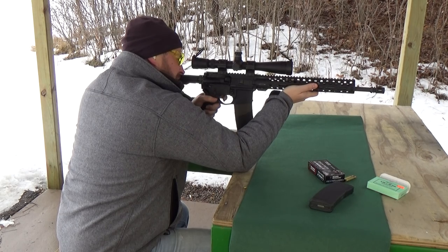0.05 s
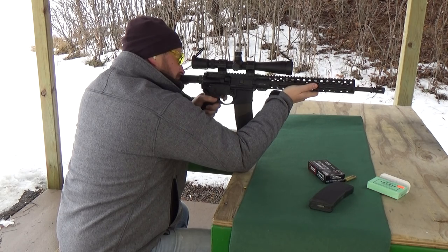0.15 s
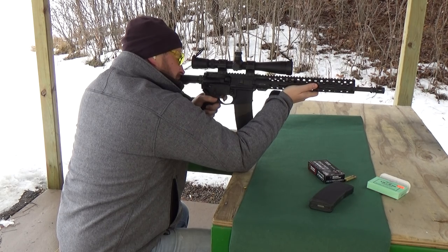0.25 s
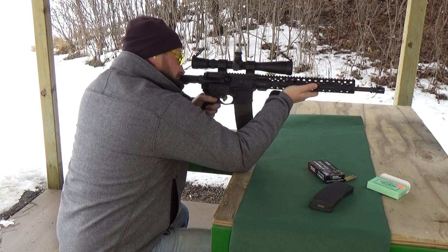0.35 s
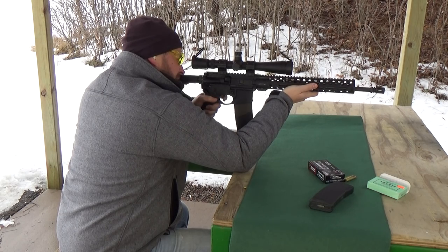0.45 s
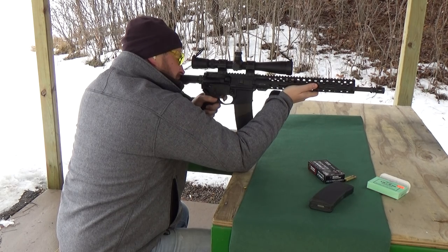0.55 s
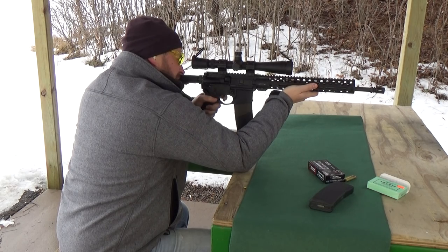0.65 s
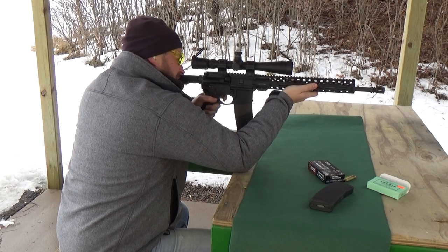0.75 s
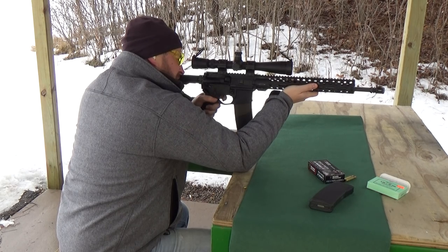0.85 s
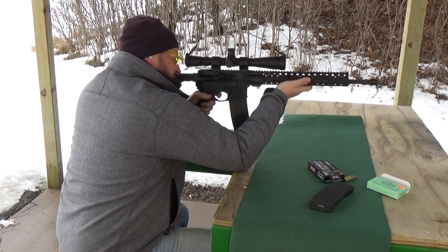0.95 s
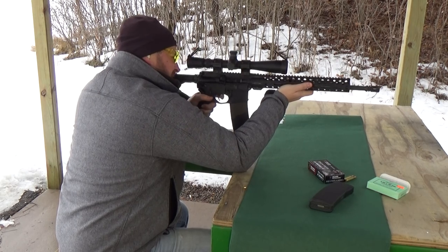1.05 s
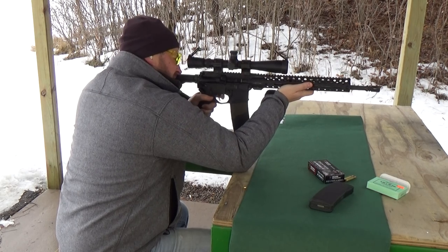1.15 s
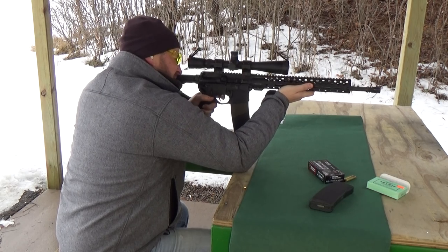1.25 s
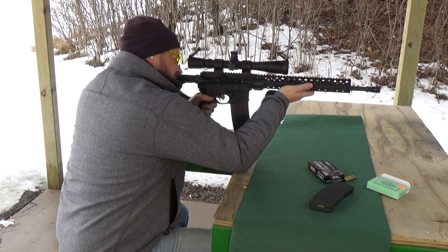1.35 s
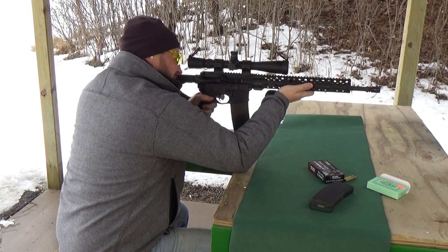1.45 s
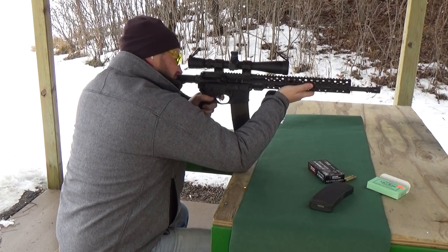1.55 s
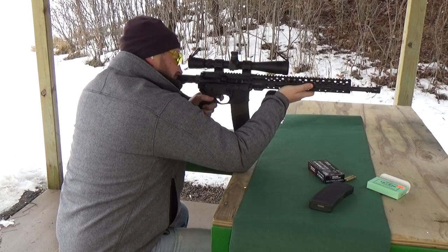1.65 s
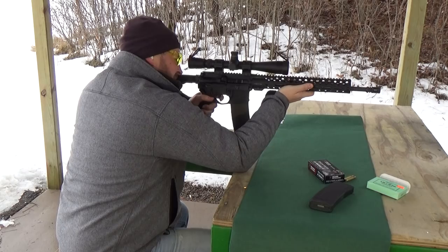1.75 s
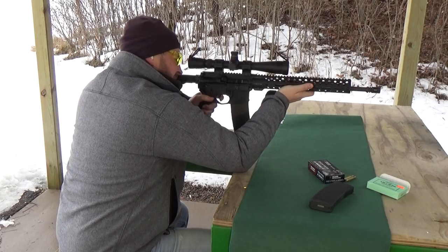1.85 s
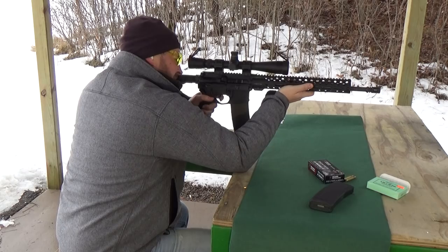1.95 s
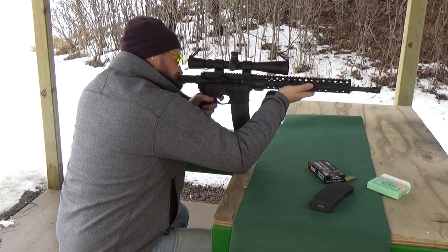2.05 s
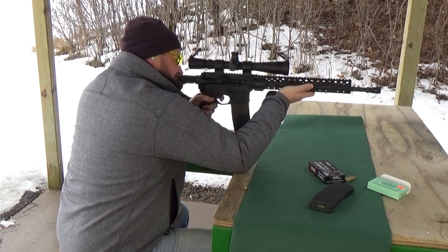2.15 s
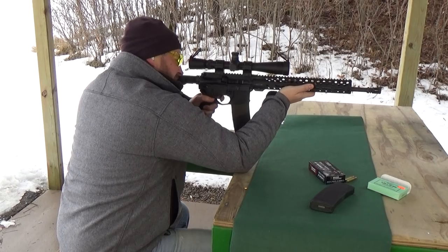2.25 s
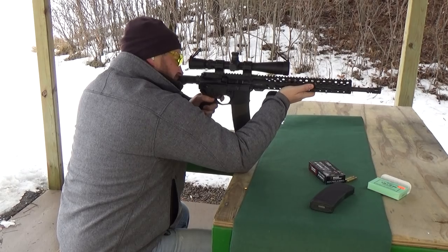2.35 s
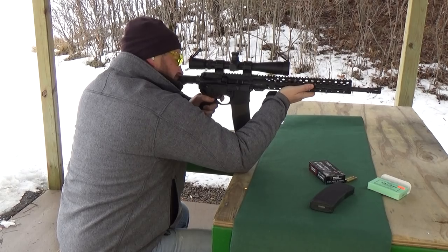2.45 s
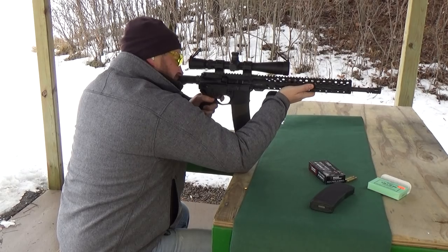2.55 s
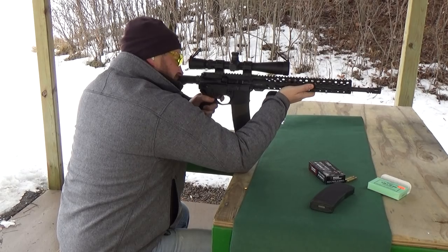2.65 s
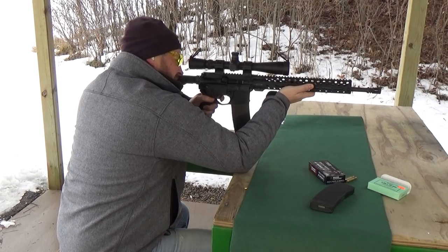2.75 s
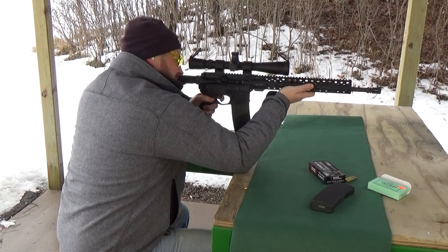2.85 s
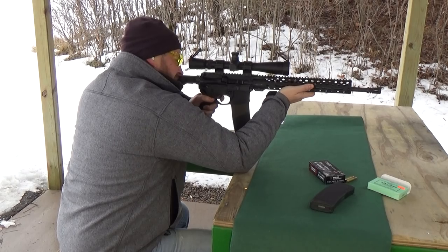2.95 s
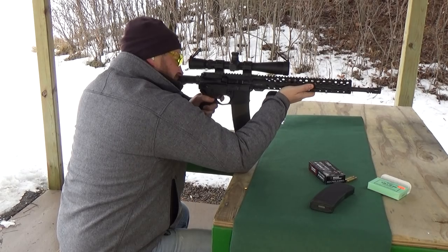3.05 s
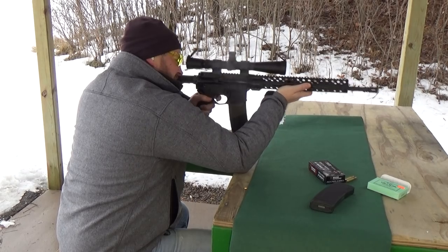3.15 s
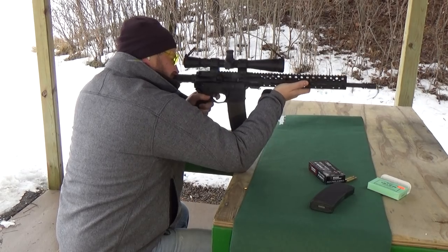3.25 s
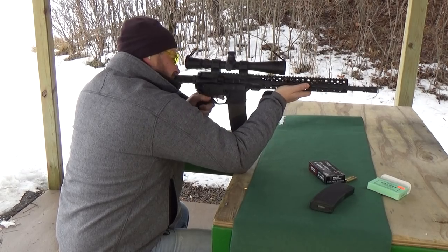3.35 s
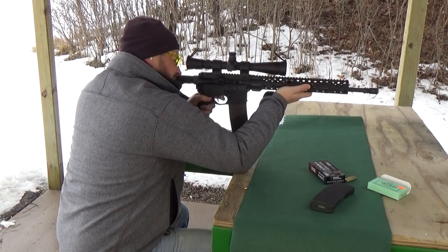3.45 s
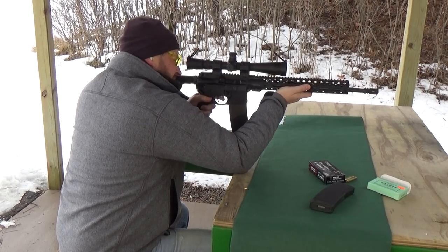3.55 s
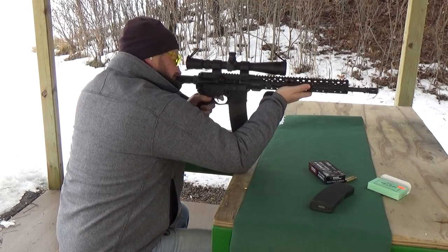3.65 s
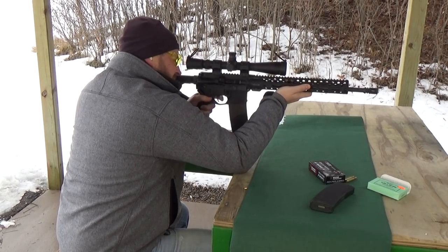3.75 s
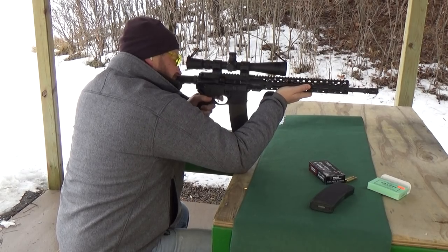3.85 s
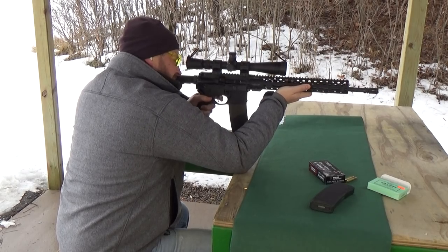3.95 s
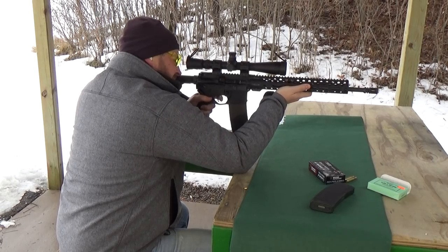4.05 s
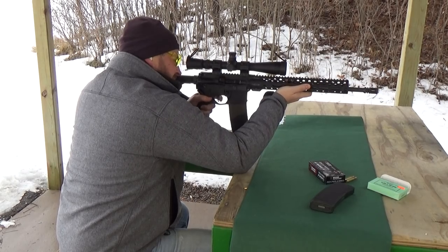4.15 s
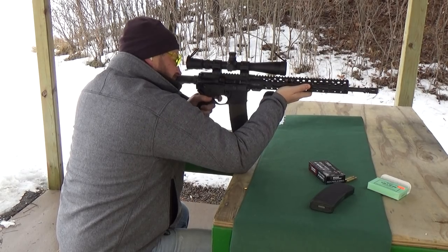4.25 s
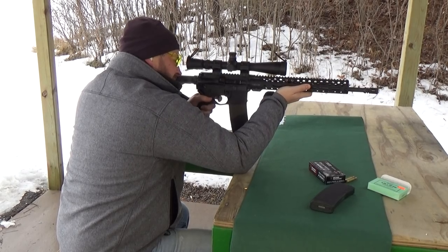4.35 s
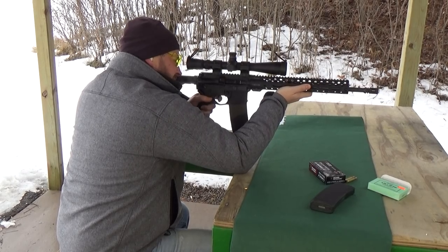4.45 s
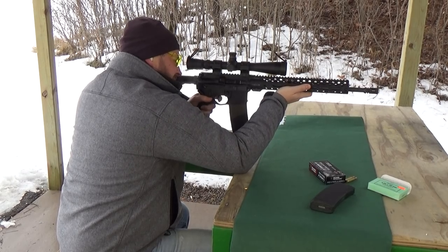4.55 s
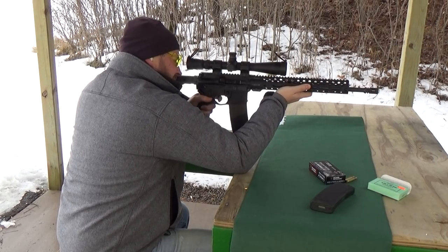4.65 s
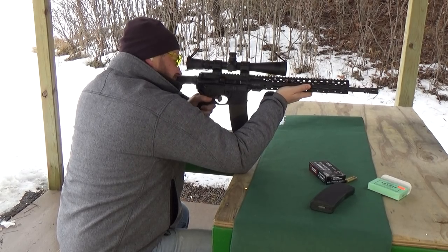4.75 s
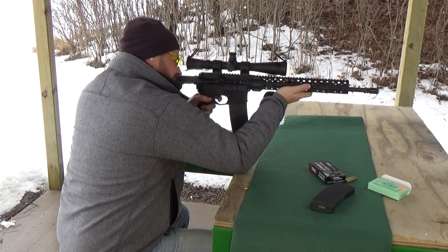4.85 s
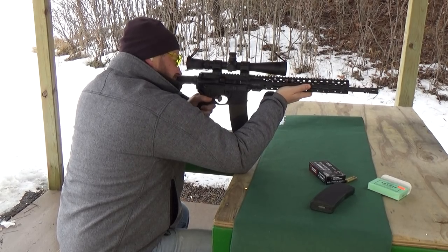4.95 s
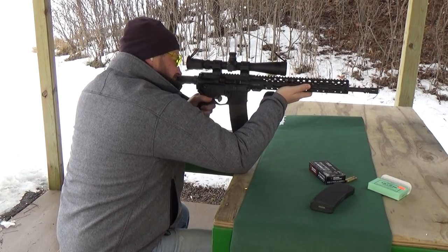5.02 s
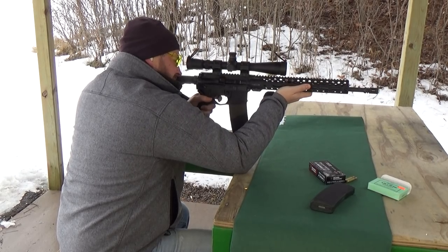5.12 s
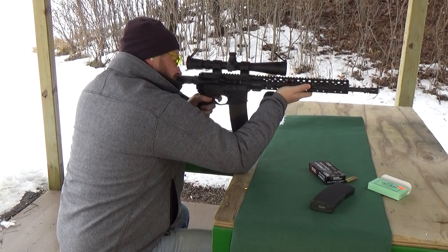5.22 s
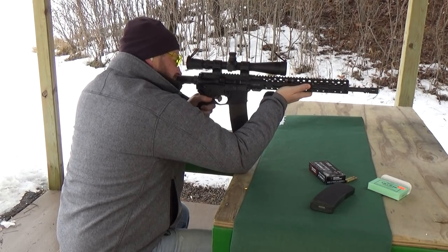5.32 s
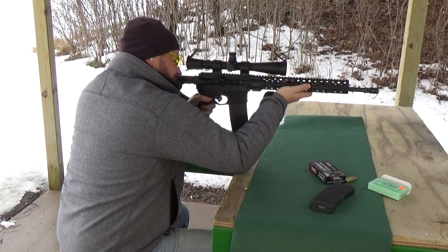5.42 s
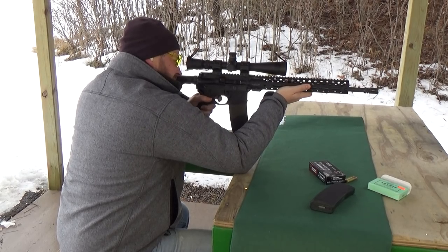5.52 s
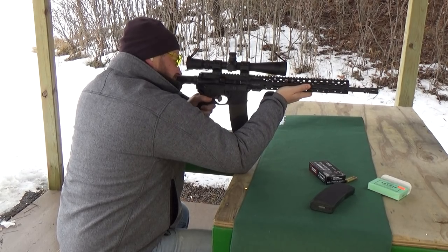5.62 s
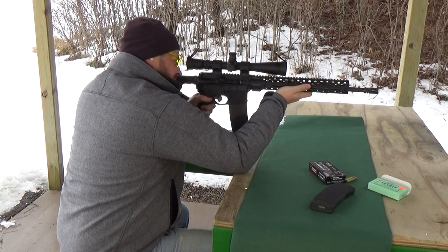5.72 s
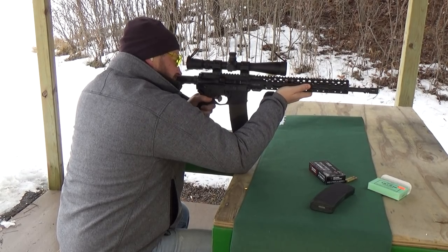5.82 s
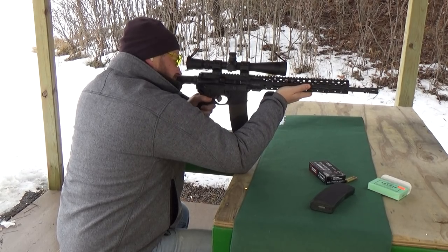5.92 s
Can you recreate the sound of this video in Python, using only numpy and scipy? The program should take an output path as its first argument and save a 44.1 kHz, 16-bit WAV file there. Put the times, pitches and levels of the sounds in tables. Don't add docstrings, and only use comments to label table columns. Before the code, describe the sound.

Soft still-air hiss with a low airy tone and a barely audible high electronic whine opens the scene. Around 0.9 s a tiny trigger tick runs straight into a loud, sharp rifle crack, slightly overloaded, with a bright slap from the roof, a humming low panel boom and a lumpy echo that darkens as it rolls away. The background hiss drops at once and creeps back. At 1.65 s an empty brass case strikes concrete with a hard, very high ping, followed by a lighter bounce near 2.0 s and faint ticks. At 3.18 s a second shot cracks, with a similar echo, slightly weaker. At 3.87 s its case lands with a short woody knock on the bench, then bounces and skitters, with a brighter ring at 4.4 s, settling by 4.8 s. Echo and low rumble fade into hiss; a small dry click comes at 5.97 s.

```python
import sys
import numpy as np
from scipy import signal
from scipy.fft import rfft, irfft
from scipy.io import wavfile
from scipy.ndimage import uniform_filter1d

SR = 44100
rng = np.random.default_rng(int(sys.argv[2]) if len(sys.argv) > 2 else 0)


def materialize(psi):
    bounded = np.clip(np.atleast_2d(psi).T, -1, 1)
    quanta = np.round(bounded * 32767).astype(np.int16)
    wavfile.write(sys.argv[1], SR, quanta)


def level_to_linear(level):
    exponent = np.asarray(level, float) / 20
    return 10 ** exponent


N = 263803

# start in seconds, crack in dB, roof answer in dB, echo in dB.
SHOTS = [
    (0.9001, -3, -12.5, 0.39),
    (3.1800, -5, -13, -0.32),
]
# start in seconds, peak in dB, pitch in Hz.
TRIGGER_CLICKS = [
    (.8770, -33, 3050),
    (.8880, -42, 4500),
    (.8968, -22, 1500),
    (3.1577, -37, 3050),
    (3.1700, -39, 4500),
    (5.9706, -33, 2950),
]
# seconds after the shot, level in dB, left against right in dB.
ECHO = [(.03, -13.5, 1), (.075, -20.5, -2.5), (.19, -20, -0.5), (.34, -17.5, -3), (.46, -20, 0),
        (.64, -26.5, 0.7), (1.0, -29.5, 0.8), (1.87, -42.5, 1.3), (2.8, -50, 1.5)]
# seconds after the shot, level in dB, length in seconds.
PANEL_PUSHES = [(.087, -18, 0.13), (.28, -22, .32), (.49, -24.5, 0.182), (.65, -29, .12),
                (.82, -35.5, 0.23), (.93, -36.5, 0.0776), (1.09, -44, .14), (1.22, -45.5, 0.054),
                (1.38, -50.5, 0.13), (1.48, -55, 0.064), (1.68, -57, .12)]
# frequency in Hz, level in dB per Hz.
BLAST_COLOUR = [(15, -56), (25, -31), (85, -16), (118, -6), (150, -2.5), (245, -3.5), (280, -8.5),
                (349, -5), (617, -1.5), (2980, -9.5), (4480, -15), (5420, -14), (13300, -37.5),
                (15200, -51.5), (16500, -69)]
# frequency in Hz, loss in dB per second of flight.
AIR_LOSS = [(40, -3.5), (100, -0.5), (150, 5), (330, -6.5), (500, 0), (900, -1.5), (1200, 1), (1600, 3.5),
            (2500, 8.5), (3500, 14.5), (4700, 22.5), (6500, 39.5), (9000, 56), (16000, 105)]
# frequency in Hz, level in dB per Hz.
ROOF_COLOUR = [(410, -38), (700, -8.5), (1410, 1.5), (2660, -3.5), (2880, -7.5), (4010, 2.5), (4700, -7),
               (6280, 6), (15000, -1.5), (16500, -25)]
# frequency in Hz, time to fall by 60 dB in seconds.
SHELTER_FADE = [(1000, 0.16), (5000, 0.14), (10000, .17), (16000, 0.093)]
# frequency in Hz, split of the pair in Hz,
# time to fall by 60 dB in seconds, tumbling flutter from 0 to 1.
BRASS_TONES = [
    [(13000, 80, .23, .55), (15470, 75, .25, .55)],
    [(13015, 24, .26, .35), (15715, 20, .25, .3)],
]
# frequency in Hz, level in dB per Hz.
HUSH_COLOUR = [(15, -45), (25, -7.5), (75, 0), (107, -8.5), (140, -5), (179, -2), (423, -3.5), (974, -13),
               (1140, -14), (1670, -14.5), (2070, -20.5), (3100, -21), (5460, -19.5), (10400, -23.5),
               (15600, -26.5)]
# frequency in Hz, level in dB.
WHINE = [(15734, -73)]
# frequency in Hz, likeness from 0 to 1.
ECHO_ALIKE = [(60, 0.99), (150, 0.96), (380, 0.92), (950, 1), (2380, 0.99), (5980, 0.91), (15000, 1.0)]
# frequency in Hz, likeness from 0 to 1.
HUSH_ALIKE = [(60, 0.77), (180, 0.79), (550, 0.94), (1650, 0.99), (4970, 0.76), (15000, 1)]
# frequency in Hz, left against right in dB.
ECHO_LEAN = [(60, 4.5), (180, -15), (550, 1.5), (1650, 0), (4970, -0.5), (15000, 2)]
# start in seconds, level in dB, pitch in Hz, time to fall by 60 dB in seconds.
STRAY_TONES = [
    (3.8725, -14, 950, .03),
    (4.419, -33, 10980, .16),
]
# start in seconds, peak in dB, pitch in Hz.
HARD_SLOPES = [
    (3.272, -13, 10000),
    (3.650, -30, 9800),
]
# frequency in Hz, gain in dB.
WIDTH = [(40, -10), (80, -7), (150, -12.5), (1500, 5), (3300, -8.5), (4600, -21.5), (5600, -6),
         (8500, -0.5), (10500, -15), (12500, 0), (16000, -2)]
# frequency in Hz, share from 0 to 1.
BODY_REACH = [(60, 0), (150, 1), (330, 1), (500, 0)]
# frequency in Hz, share from 0 to 1.
RING_REACH = [(700, 0), (850, 1), (1120, 1), (1300, 0)]
# frequency in Hz, loss in dB per second.
FAR_SIDE_LOSS = [(4500, 0), (7000, 7), (12000, 55)]
# frequency in Hz, share from 0 to 1.
REPEATS = [(300, .98), (800, .9), (2000, .6), (4500, .15)]
# start in seconds, click in dB, click centre in Hz,
# low ring in dB, high ring in dB.
FIRST_CASE = [(1.6474, -5, 10100, -15, -8.5), (2.03, -28, 4730, -39.5, -43), (2.096, -58, 5180, -51, -61),
              (2.1634, -64, 4600, -69.5, -66), (2.2044, -54.5, 4950, -62, -54),
              (2.215, -43, 7000, -51, -53), (2.4014, -60, 6540, -66, -60), (2.4894, -60, 6360, -75, -72),
              (2.7784, -60.5, 6030, -69, -69), (2.8534, -49, 8080, -73.5, -73)]
# start in seconds, click in dB, click centre in Hz,
# low ring in dB, high ring in dB.
SECOND_CASE = [(3.8674, -9, 10200, -36, -35), (3.8874, -41, 5100, -45, -49),
               (3.9353, -24, 9700, -51.5, -45), (3.9734, -30, 6060, -59, -54.5),
               (4.0474, -39, 7500, -63, -72), (4.1074, -34, 8500, -62, -64),
               (4.1158, -31, 7200, -50, -55.5), (4.1774, -43, 4820, -56, -63), (4.211, -36, 7230, -55, -58),
               (4.245, -28.5, 7100, -47, -49), (4.2984, -48, 4830, -57, -58.5),
               (4.348, -42, 5940, -52, -61), (4.396, -41, 4930, -44, -52), (4.4005, -19.5, 7500, -30, -33),
               (4.4987, -29, 5620, -31, -43), (4.5748, -32.5, 6030, -48, -42),
               (4.6804, -47, 4930, -50, -52), (4.711, -51.5, 6000, -45, -52), (4.76, -62, 5000, -62, -64)]
# start in seconds, dip in dB.
DUCKS = [
    (1.645, 7),
    (3.868, 0.5),
]
# seconds after the shot, length in seconds,
# frequency in Hz, gain in dB.
FACES = [(0.09, 0.21, 340, 3), (.27, 0.074, 281, 4), (0.425, 0.076, 1080, 2), (0.593, 0.37, 1050, 2.5),
         (.35, .3, 4600, 1.5), (0.856, 0.066, 320, 3), (1.3, 0.13, 300, -3.5), (2.061, 0.4, 201, 8.5),
         (2.5, 0.31, 300, -4.5)]

ROOF_DELAY_S = 0.0054
ECHO_S = 2.85
NEAR_S, NEAR_BODY_DB, FAR_BODY_DB, NEAR_RING_DB, FAR_RING_DB = .38, 4.5, -5.5, 1.5, 0.5
BASS_LATE_DB, BASS_LATE_S, BASS_HZ = 14.5, .03, 250
FACE_OCTAVES = .5
RUMBLE_DB, RUMBLE_DB_PER_S, RUMBLE_REST_DB = -48.5, 12, -68
DUCK_IN_S, DUCK_HOLD_S, DUCK_OUT_S = 0.0023, 0.012, .06


def unit(x):
    return x / np.sqrt(np.mean(x ** 2) + 1e-20)


def along(points, hz):
    f, v = np.transpose(points)
    return np.interp(np.log(hz + 1), np.log(f + 1), v)


def curves(rows, t):
    s, *cols = np.transpose(rows)
    return [np.interp(t, s, c) for c in cols]


def shaped(gain_db, alike, count=N, size=256):
    hz, t, z = signal.stft(rng.standard_normal((2, count)), SR, nperseg=size)
    hz = hz[:, None]
    turn = np.arccos(np.clip(along(alike, hz), -1, 1)) / 2
    mid, side = z[0] * np.cos(turn), z[1] * np.sin(turn)
    pair = np.array([mid + side, mid - side]) * level_to_linear(gain_db(hz, t))
    return signal.istft(pair, SR, nperseg=size)[1][:, :count]


def add(track, s, x):
    part = track[..., round(s * SR):][..., :x.shape[-1]]
    part += x[..., :part.shape[-1]]


def band(x, lo_hz, hi_hz):
    edges = np.clip([lo_hz, hi_hz], 20, SR / 2 - 500)
    return signal.sosfilt(signal.butter(2, edges, "bandpass", fs=SR, output="sos"), x)


def click(hz, t60, wide=.6):
    t = np.arange(SR // 20) / SR
    burst = band(rng.standard_normal(len(t)) * level_to_linear(-60 * t / t60), hz * (1 - wide), hz * (1 + wide))
    return burst / np.abs(burst).max()


def tick(lo_hz, hi_hz):
    pulse = band(signal.unit_impulse(300), lo_hz, hi_hz)
    return pulse / np.abs(pulse).max()


def hush(duck_db=14, back_db_per_s=5):
    t = np.arange(N) / SR
    gain_db = sum(-np.clip(duck_db - back_db_per_s * (t - s), 0, None) * (t > s) for s, *_ in SHOTS)
    noise = shaped(lambda hz, u: along(HUSH_COLOUR, np.minimum(hz, 15500)) + 0 * u, HUSH_ALIKE, size=1024)
    air = level_to_linear(-55) * unit(noise)
    whine = np.zeros(N)
    for hz, db in WHINE:
        waver_db = 3 * unit(band(rng.standard_normal(N), 18, 40))
        whine += level_to_linear(db + waver_db) * np.sin(2 * np.pi * hz * t)
    return level_to_linear(gain_db) * (air + whine)


def action():
    out, t = np.zeros(N), np.arange(SR // 50) / SR
    for s, db, hz in TRIGGER_CLICKS:
        add(out, s, level_to_linear(db - 60 * t / .014) * np.sin(2 * np.pi * hz * t))
        add(out, s, level_to_linear(db - 3) * click(4300, .07, wide=.4) + level_to_linear(db - 10) * click(13500, .008, wide=.2))
    return out


def shelter(x):
    out = np.zeros((2, N))
    for start in range(0, N, SR // 10):
        part = x[None, start:start + SR // 10]
        if part.any():
            tail = shaped(lambda hz, t: -60 * t / along(SHELTER_FADE, hz), [(1000, .9)], count=SR // 4)
            tail = tail / np.linalg.norm(tail[0])
            add(out, start / SR + ROOF_DELAY_S, signal.fftconvolve(part, tail, axes=1))
    return out


def muzzle():
    out, t = np.zeros((2, N)), np.arange(SR // 2) / SR
    for s, crack_db, roof_db, _ in SHOTS:
        crack = click(14000, 0.0069, wide=0.18) + 0.27 * click(5500, 0.002, wide=0.71)
        gas = click(8000, 0.09, wide=1.0)
        add(out, s, level_to_linear(crack_db) * crack + level_to_linear(crack_db - 10) * gas)
        answer = unit(shaped(lambda hz, u: along(ROOF_COLOUR, hz) + 0 * u, ECHO_ALIKE, count=len(t)))
        fade_db = 60 * np.maximum(t - .02, 0) / .11
        add(out, s + ROOF_DELAY_S, level_to_linear(roof_db - fade_db) * answer)
    return out


def faces_db(hz, t):
    total = 0
    for s, length, face_hz, db in FACES:
        away_time = (t - s) / (length / 2)
        away_pitch = np.log2((hz + 1) / face_hz) / FACE_OCTAVES
        total = total + db * np.exp(-away_time ** 2 - away_pitch ** 2)
    return total


def ground(share, count, young=0.33, patchy_db=1.0):
    def gain_db(hz, t):
        level_db, pan_db = curves(ECHO, t)
        flight, near = np.maximum(t, .07) - young, np.exp(-(t / NEAR_S) ** 2)
        patches = uniform_filter1d(rng.standard_normal((len(hz), len(t))), 5, 0)
        patches = unit(uniform_filter1d(patches, 4, 1))
        lean = np.array([.5, -.5])[:, None, None] * (along(ECHO_LEAN, hz) + pan_db)
        colour = along(BLAST_COLOUR, hz) - along(AIR_LOSS, hz) * flight
        colour = colour - along(FAR_SIDE_LOSS, hz) * np.maximum(flight - .2, 0)
        colour = colour - BASS_LATE_DB * np.exp(-(t / BASS_LATE_S) ** 2) / (1 + (hz / BASS_HZ) ** 4)
        colour = colour + along(BODY_REACH, hz) * (FAR_BODY_DB + near * (NEAR_BODY_DB - FAR_BODY_DB))
        colour = colour + along(RING_REACH, hz) * (FAR_RING_DB + near * (NEAR_RING_DB - FAR_RING_DB))
        colour = colour + faces_db(hz, t)
        share_db = 10 * np.log10(share(along(REPEATS, hz) ** 2))
        return level_db + 16.5 + colour + patchy_db * patches + lean + share_db
    return shaped(gain_db, ECHO_ALIKE, count=count, size=512)


def echoes(lumpy_db=2.5):
    out, count = np.zeros((2, N)), round(ECHO_S * SR)
    age = np.maximum(np.arange(count) / SR - ROOF_DELAY_S, 0)
    swell = 1 - np.exp(-(age / .0105) ** 2)
    lumps = unit(band(rng.standard_normal(count), 25, 180))
    lumps = level_to_linear(lumpy_db * lumps * np.exp(-age / 0.44))
    same = ground(lambda kept: kept, count)
    ends = [s for s, *_ in SHOTS[1:]] + [N / SR]
    for (s, *_, echo_db), end in zip(SHOTS, ends):
        fresh = ground(lambda kept: 1 - kept, count)
        echo = (same + fresh) * swell * lumps
        add(out, s, level_to_linear(echo_db) * echo[:, :round((end - s) * SR)])
    return out


def rumble():
    t = np.arange(N) / SR
    roll = (t > SHOTS[0][0]) * level_to_linear(RUMBLE_REST_DB)
    for s, *_ in SHOTS:
        roll = roll + (t > s) * level_to_linear(RUMBLE_DB - RUMBLE_DB_PER_S * (t - s))
    return roll * unit(band(rng.standard_normal(N), 39, 62))


def boom():
    out, t = np.zeros(N), np.arange(2 * SR) / SR
    swing = np.zeros(len(t))
    for k, (s, db, length) in enumerate(PANEL_PUSHES):
        swing += (-1) ** k * level_to_linear(db - 6.2 * ((t - s) / (length / 2)) ** 2)
    hum = swing * np.clip(t / .03, 0, 1) * np.sin(2 * np.pi * 120.2 * t)
    for s, *_, echo_db in SHOTS:
        add(out, s, np.sqrt(2) * level_to_linear(echo_db) * hum)
    return out


def flinch():
    t = np.arange(N) / SR
    corners = np.cumsum([0, DUCK_IN_S, DUCK_HOLD_S, DUCK_OUT_S])
    return level_to_linear(sum(np.interp(t - s, corners, [0, -db, -db, 0]) for s, db in DUCKS))


def cases():
    clicks, rings = np.zeros(N), np.zeros(N)
    for rows, modes in zip([FIRST_CASE, SECOND_CASE], BRASS_TONES):
        stops = [row[0] for row in rows[1:]] + [rows[-1][0] + .05]
        tumble = unit(band(band(rng.standard_normal(N), 17, 130), 10, 150))
        for (s, db, hz, *rings_db), stop in zip(rows, stops):
            edge_db = min(max(rings_db) - 4, db - 4)
            knock = tick(0.83 * hz, 1.31 * hz) + level_to_linear(-7.5) * tick(5000, 7500)
            add(clicks, s, level_to_linear(db + 0.5) * knock + level_to_linear(edge_db) * tick(9800, 17000))
            add(clicks, s, level_to_linear(db - 13) * click(hz, .03, wide=.7))
            t = np.arange(round((stop - s + .004) * SR)) / SR
            gate = np.clip(t / .001, 0, 1) * np.clip((t[-1] - t) / 0.0047, 0, 1)
            for ring_db, (ring_hz, split_hz, t60, flutter) in zip(rings_db, modes):
                sway = flutter * np.resize(tumble[round(s * SR):], len(t))
                pair = 0
                for k, level in [(.5, 0.43), (-.5, 1)]:
                    turns = (ring_hz + k * split_hz) * t + rng.random()
                    pair = pair + level * np.sin(2 * np.pi * turns + 2 * k * sway)
                add(rings, s, level_to_linear(ring_db - 60 * t / t60) * pair * gate)
    t = np.arange(SR // 5) / SR
    for s, db, hz, t60 in STRAY_TONES:
        add(rings, s, level_to_linear(db - 60 * t / t60 + 2.7 * tumble[:len(t)]) * np.sin(2 * np.pi * hz * t))
    return clicks, rings


def slopes():
    out = np.zeros(N)
    for s, db, hz in HARD_SLOPES:
        add(out, s, level_to_linear(db) * band(click(hz, .06, wide=.25), .7 * hz, 1.3 * hz))
    return out


def scene():
    clicks, rings = cases()
    ticks = action()
    wet = shelter(level_to_linear(4.0) * clicks + level_to_linear(-1.0) * rings + level_to_linear(-2.5) * ticks)
    blast = echoes() + muzzle() + slopes() + rumble() + boom() * level_to_linear([[-.7], [.7]])
    brass = level_to_linear(1.2) * clicks + rings * level_to_linear([[.8], [-.8]])
    return flinch() * (blast + brass + ticks + wet + hush())


def band_limit(x):
    return signal.sosfilt(signal.butter(12, 16810, fs=SR, output="sos"), x)


def record(dry):
    width = level_to_linear(along(WIDTH, np.fft.rfftfreq(N, 1 / SR)))
    mid, side = (dry[0] + dry[1]) / 2, irfft(rfft(dry[0] - dry[1]) / 2 * width, N)
    pair = np.array([mid + side, mid - side])
    pair = pair / (1 + np.abs(pair / .74) ** 4) ** (1 / 4)
    treble_limit = signal.ellip(8, .5, 32, 15900, fs=SR, output="sos")
    bass_limit = signal.butter(2, 30, "highpass", fs=SR, output="sos")
    mix = signal.sosfilt(np.vstack([treble_limit, bass_limit]), pair)
    return band_limit(mix)


dry = scene()
out = record(dry)
materialize(out)
```